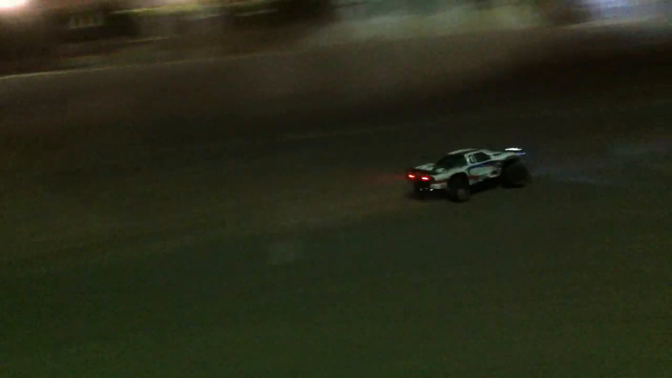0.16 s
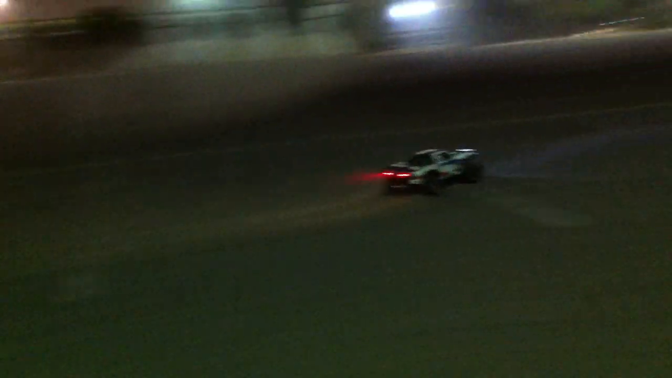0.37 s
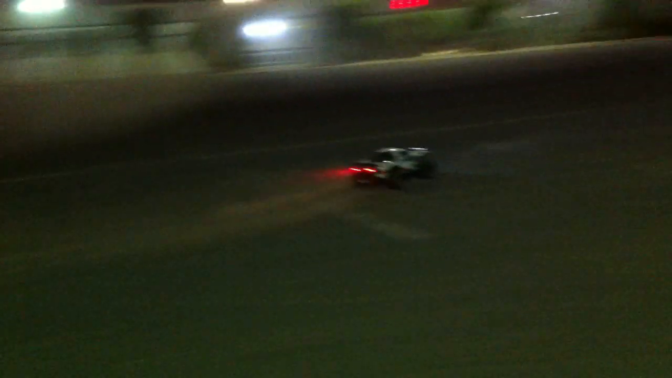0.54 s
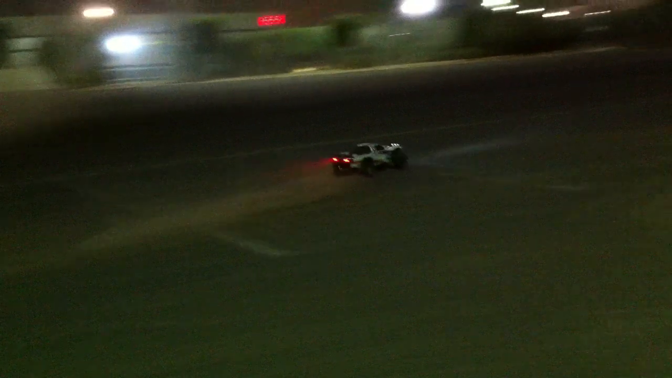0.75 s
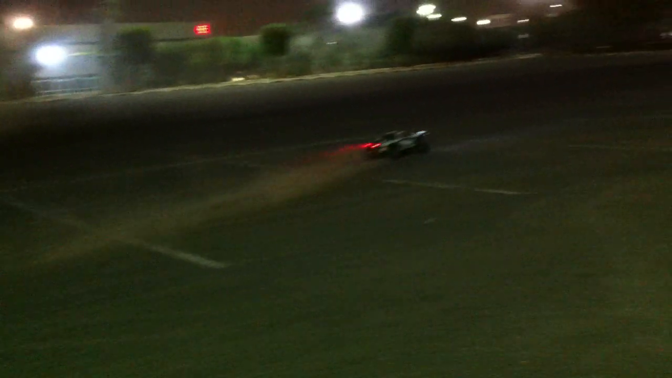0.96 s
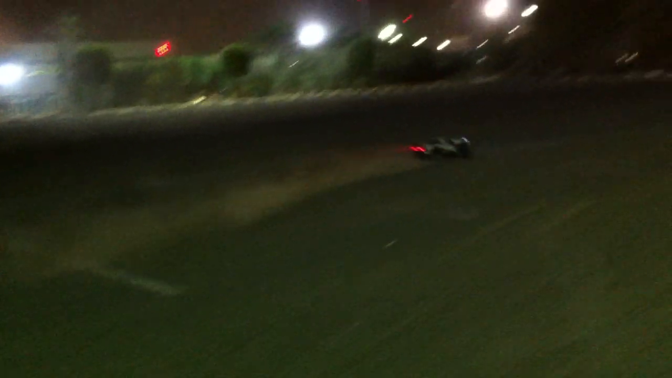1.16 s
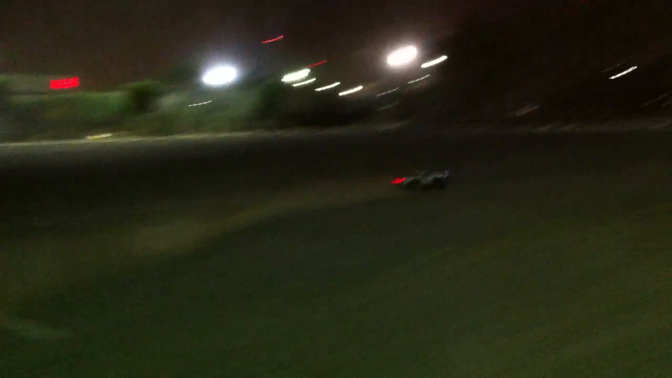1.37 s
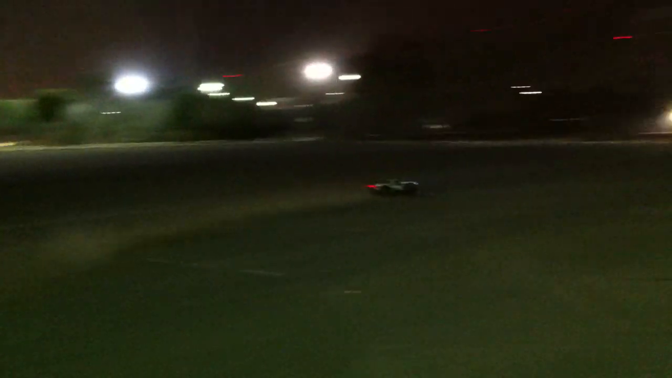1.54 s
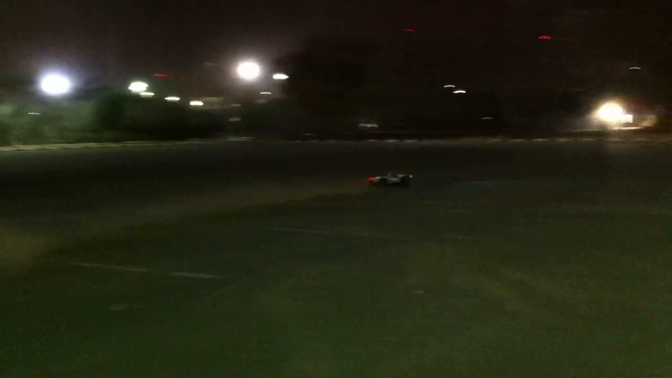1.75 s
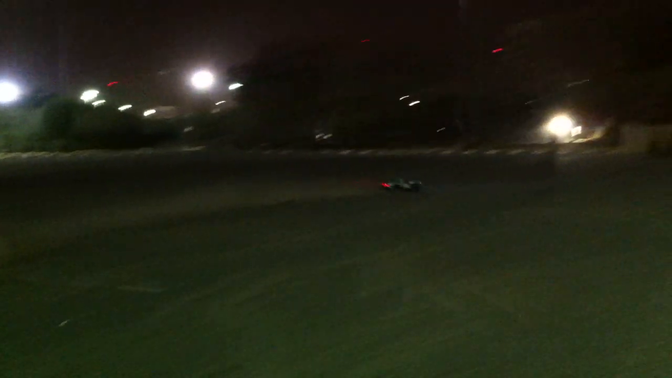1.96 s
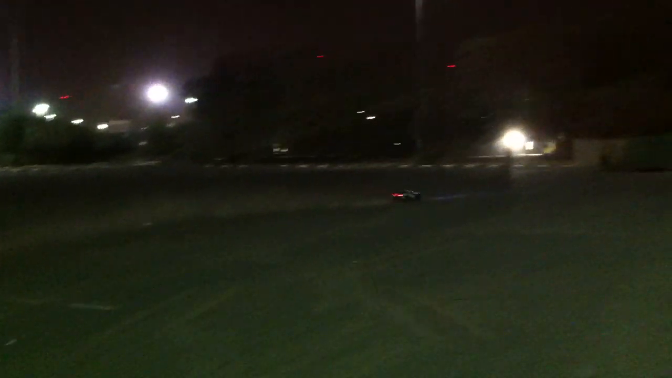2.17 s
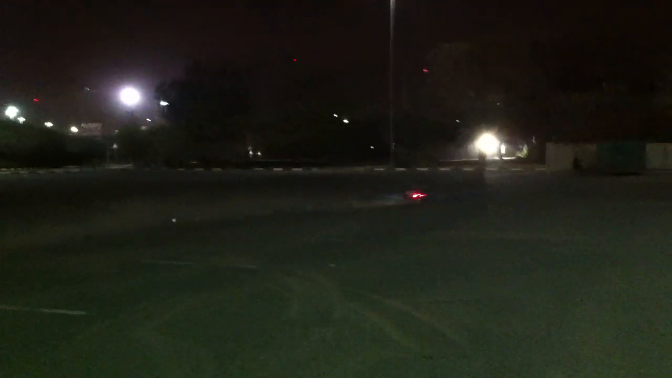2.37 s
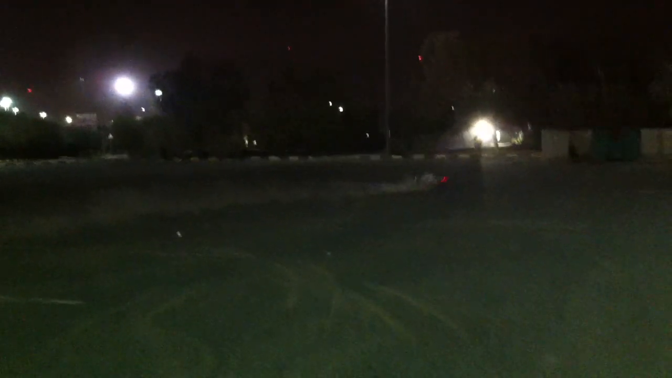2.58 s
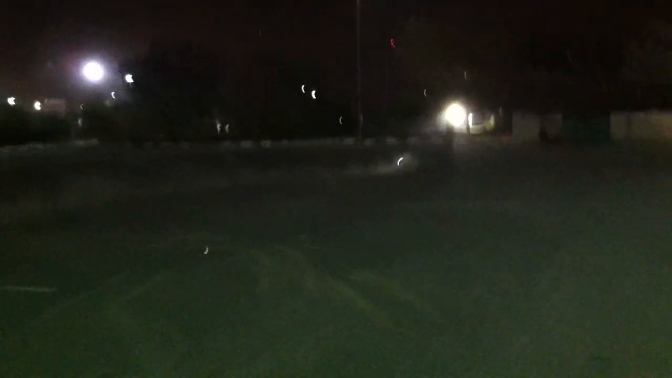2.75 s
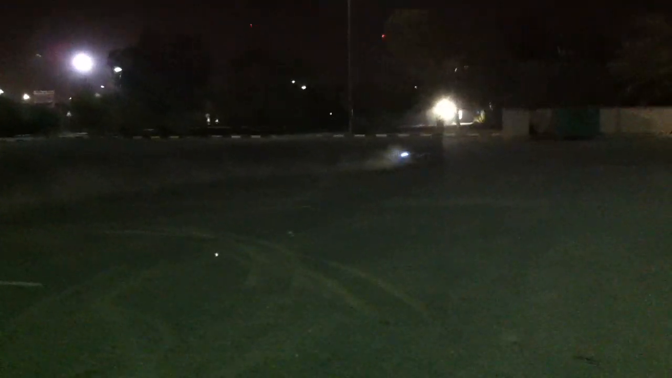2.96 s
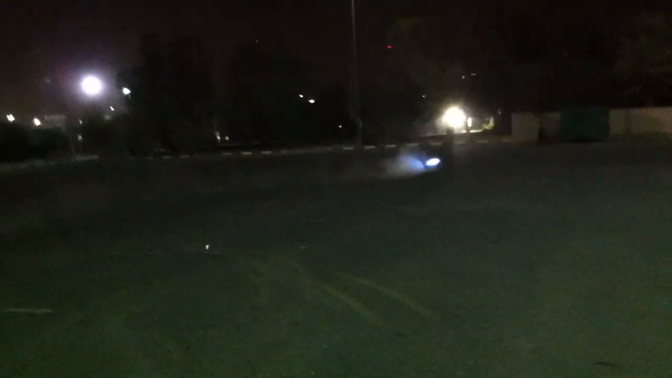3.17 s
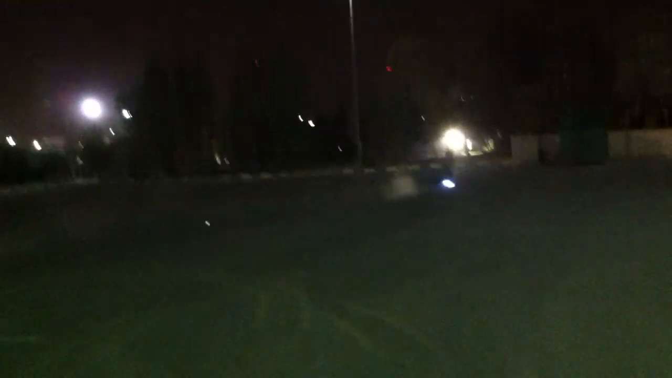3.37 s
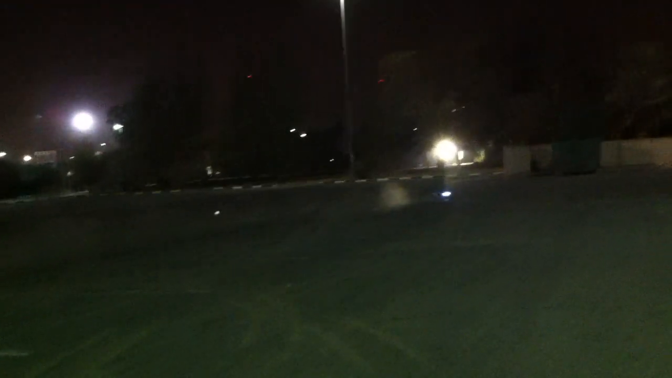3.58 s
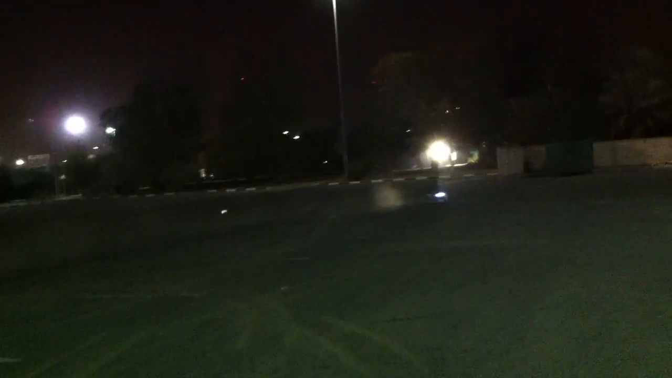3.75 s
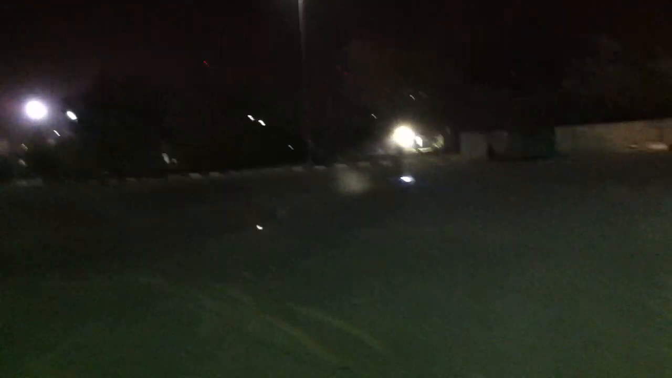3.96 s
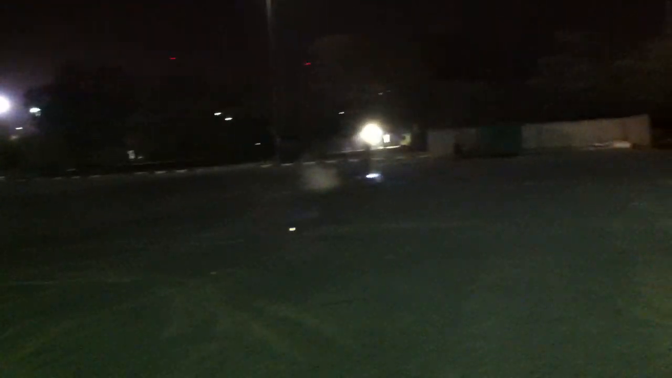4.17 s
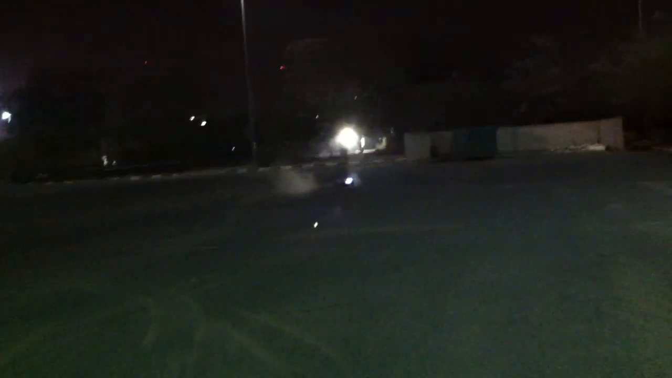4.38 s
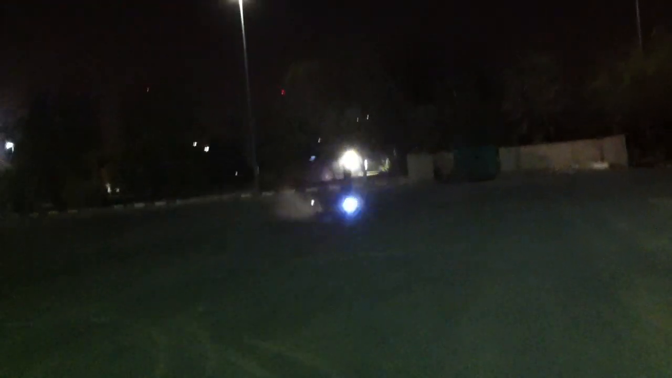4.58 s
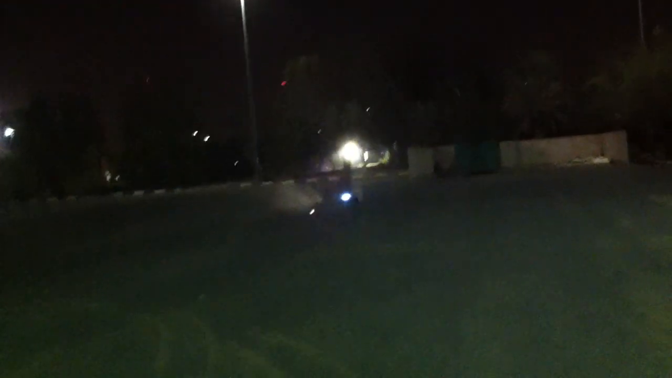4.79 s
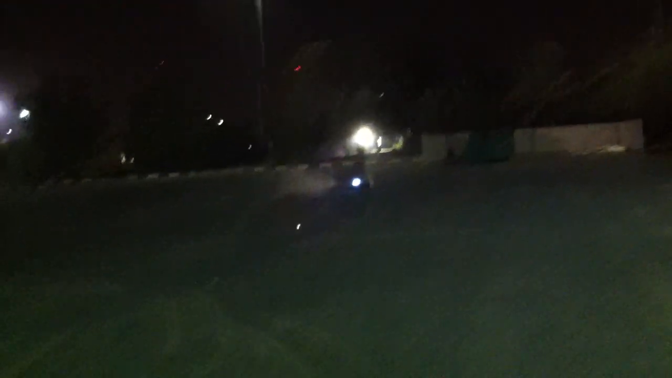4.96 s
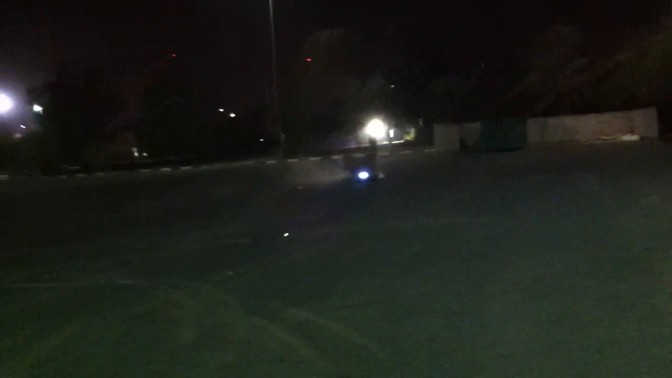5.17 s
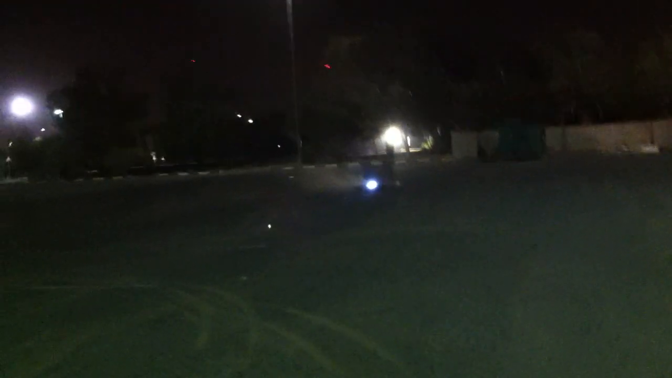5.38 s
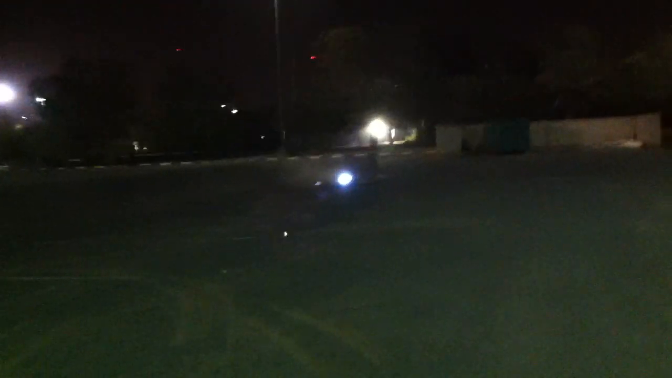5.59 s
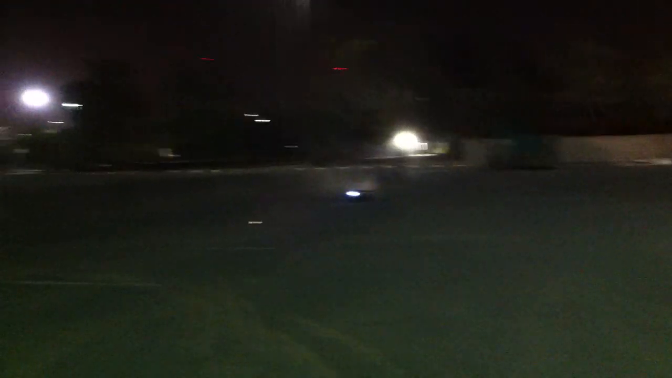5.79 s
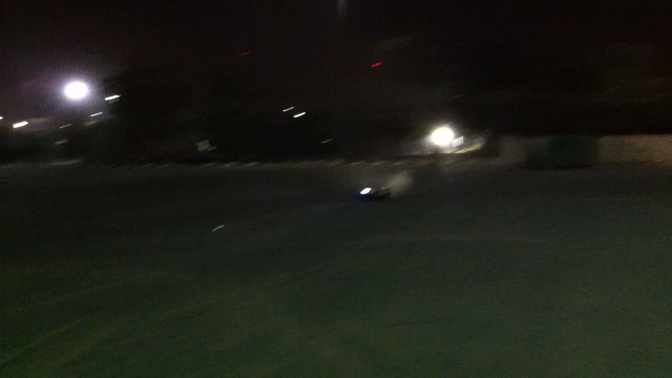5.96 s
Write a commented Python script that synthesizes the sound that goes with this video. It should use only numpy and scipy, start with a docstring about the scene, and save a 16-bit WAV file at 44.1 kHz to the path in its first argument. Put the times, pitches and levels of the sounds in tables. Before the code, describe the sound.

The small two-stroke engine of a remote control car buzzes loudly close by, lifts off for an instant and revs higher as it races away over an open asphalt lot. It drops to a quiet, puttering idle with a light gear whine and tyres scrubbing in the distance. A few short throttle blips follow, then it accelerates back toward the microphone, rising in pitch. Trees and a wall give a faint echo.

```python
"""The small two-stroke engine of a radio-controlled car races away over an open asphalt lot, coasts
to idle, turns round with two blips of throttle and accelerates back. Once a turn an exhaust pulse
excites the silencer, and the intake honks as the throttle opens. Off throttle the engine putters and
its crankcase clatters and hums. Gears whine through their housing; tyres hiss, scrub and flick grit.
A wall and trees reflect the sound, and a distant town roars beneath it."""
import sys
import numpy as np
from scipy import signal
from scipy.fft import rfft, irfft
from scipy.io import wavfile
from scipy.ndimage import uniform_filter1d, map_coordinates

SR = 44100
rng = np.random.default_rng(int(sys.argv[2]) if len(sys.argv) > 2 else 0)


def persist_wave(psi):
    """Save psi, clipped to +-1, as 16-bit WAV."""
    counts = np.round(np.clip(psi, -1, 1) * 32767).astype(np.int16)
    wavfile.write(sys.argv[1], SR, np.atleast_2d(counts).T)


N = 265923
TIME = np.arange(N) / SR
CLUTCH_SPEED, CLEAN_SPEED = 160, 116  # turns per second: the clutch bites; misfiring ends

# Throttle bursts. Each row: opening and shutting in seconds, target speed in turns per second, rev-up,
# run-down and catching times in seconds, relative bark in dB, relative rasp in dB, its trend in dB/s.
BURSTS = [(0, .611, 160.4, .044, .174, .002, -22.5, 2.5, -8.5),
          (.686, 1.611, 239.8, .143, .235, .006, -22.6, -.8, -3.3),
          (3.657, 4.086, 86.1, .03, .2, .08, -34, -16, 0),
          (4.086, 4.534, 161, .128, .055, .008, -26, -10.5, -1),
          (4.676, 4.811, 157.5, .04, .06, .002, -26.5, -10, -8),
          (5.032, 6.1, 159, .076, .1, .022, -23.3, -14.5, 5)]


def amp(db):
    """Decibels to amplitude ratio."""
    return 10 ** (np.asarray(db) / 20)


def evened(x):
    """Normalisation to an overall rms of 1."""
    return x / np.sqrt(np.mean(x ** 2) + 1e-20)


def steady(x, size=3500):
    """Normalisation to a running rms of 1."""
    return x / np.sqrt(uniform_filter1d(uniform_filter1d(x ** 2, size), size) + 1e-12)


def ease(start, length, curve):
    """A step response from 0 to 1: curve 1 is a first-order lag, higher starts more softly."""
    return 1 - np.exp(-(np.maximum(TIME - start, 0) / length) ** curve)


def swell(s, half):
    """A Gaussian envelope of height 1, centred on s."""
    return np.exp(-((TIME - s) / half) ** 2)


def drift(hz, step=64):
    """Random modulation: low-passed noise of rms 1."""
    coarse = TIME[::step]
    rolloff = np.exp(-(np.fft.rfftfreq(len(coarse), step / SR) / hz) ** 2)
    slow = irfft(rfft(rng.standard_normal(len(coarse))) * rolloff, len(coarse))
    return np.interp(TIME, coarse, evened(slow))


def read(points, hz):
    """Interpolation on a log-frequency axis."""
    f, value = np.transpose(points)
    return np.interp(np.log(hz + 1), np.log(f + 1), value)


def colour(x, shape, size=8192):
    """Minimum-phase filtering; shape gives dB against Hz, as a function or as points."""
    hz = abs(np.fft.fftfreq(size, 1 / SR))
    db = shape(hz) if callable(shape) else read(shape, hz)
    log_gain = np.log(amp(np.maximum(db, -100)))
    taps = np.fft.ifft(np.exp(signal.hilbert(log_gain).conj())).real[:size // 2]
    return signal.oaconvolve(x, taps)[:N]


def filtered(x, hz, kind="low", order=2):
    """Filtering with a maximally flat passband."""
    return signal.sosfilt(signal.butter(order, hz, kind, fs=SR, output="sos"), x)


def ring(x, modes):
    """Forced response of damped modes in parallel."""
    return sum(amp(db) * signal.lfilter(*signal.iirpeak(hz, hz / width, SR), x)
               for hz, width, db in modes)


def firings(turns, uneven_db, jitter_s, gas_decay, gas_floor, miss=0):
    """A quasi-periodic train: a pulse and a decaying puff of noise each turn; miss weakens every other."""
    samples = np.arange(N)
    at = np.interp(np.arange(1, int(turns[-1])), turns, samples)
    spread, late = rng.standard_normal((len(at), 2)).T
    missed = np.interp(at, samples, miss * np.ones(N)) * (np.arange(len(at)) % 2)
    at = at + late * jitter_s * SR
    strength = amp(uneven_db * spread) * (1 - missed)
    near = at.astype(int)[:, None] + np.arange(-8, 9)
    impulses = strength[:, None] * np.sinc(near - at[:, None])
    pulses = np.bincount(np.clip(near, 0, N - 1).ravel(), impulses.ravel(), N)
    puff = (gas_floor + np.exp(-(turns % 1) / gas_decay)) * np.interp(samples, at, strength)
    return steady(pulses), evened(puff * rng.standard_normal(N))


def town():
    """Distant town and road sounds merge into broadband noise whose level wavers gently."""
    # Each row: frequency in Hz, relative level in dB.
    roar = [(50, -43.5), (80, -40), (110, 4), (200, 3), (260, 3), (350, -13.5), (600, -27.5), (1000, 2),
            (1600, -2), (2500, -9.5), (7000, -36)]
    return amp(-46 + .8 * drift(hz=7.2)) * evened(colour(rng.standard_normal(N), roar))


def lot(x, echo_s=.115):
    """Reflection and scattering: a wall returns one dull echo, trees a thin decaying tail."""
    # Each row: frequency in Hz, reverberation time in seconds.
    decay_times = [(150, .3), (600, .6), (2500, .7), (6000, .1), (15000, .03)]
    arrivals = rng.standard_normal(SR) * (rng.random(SR) < 1500 / SR)
    hz, t, spectra = signal.stft(arrivals, SR, nperseg=256)
    envelope = amp(-60 * t / read(decay_times, hz)[:, None]) * (1 - np.exp(-t / .01))
    tail = signal.istft(spectra * envelope, SR, nperseg=256)[1]
    scattered = signal.fftconvolve(x, tail / np.linalg.norm(tail))[:N]
    echo = filtered(np.interp(TIME - echo_s, TIME, x, left=0), 3000)
    return amp(-20) * (scattered + echo)


def stones():
    """Impact excites one heavily damped mode: each flicked stone lands with a dry tick."""
    # Each row: start in seconds, relative level in dB, ring frequency in Hz.
    landings = [(2.0977, -25, 2410), (3.382, -14, 1910)]
    ticks = np.zeros(N)
    for s, db, hz in landings:
        t = np.maximum(TIME - s, 0)
        ticks += amp(db + 2) * np.sin(2 * np.pi * hz * t) * np.exp(-t / .00085)
    return filtered(ticks, 1000, "high")


def tyres(revs):
    """Friction noise: rubber hisses on gritty asphalt and hollow tyres resonate, fading with distance."""
    # Hiss spectrum. Each row: frequency in Hz, relative level in dB.
    hiss_colour = [(1000, -4), (2500, 16), (3800, 6.5), (5500, 1), (8000, -5.5), (12000, -8.5),
                   (15500, -14)]
    # Each row: frequency in Hz, bandwidth in Hz, gain in dB.
    cavity_modes = [(484, 63, -34), (602, 305, 12), (667, 190, -5)]
    # Each row: centre and half-length in seconds, hiss lift in dB, scrub lift in dB.
    slides = [(2.147, 0.2, 3, 6), (2.715, 0.28, 12.5, 9.5), (3.193, 0.36, 14.5, 8), (4.59, 0.2, 7.5, 7.5),
              (4.873, 0.033, 4.5, 6)]
    # Each row: time in seconds, distance of the car in metres.
    route = [(0, 2.1), (1.6, 4), (3, 101), (5, 20), (6, 1.2)]
    grain_size = amp(4.8 * np.minimum(rng.exponential(1, N), 5))
    grit = evened(grain_size * (rng.random(N) < 500 / SR))
    hiss = colour(rng.standard_normal(N) + amp(-7) * grit, hiss_colour)
    scrub = filtered(ring(rng.standard_normal(N), cavity_modes), 1200)
    hiss_db = -39.5 + 19.5 * revs + sum(db * swell(s, half) for s, half, db, _ in slides)
    scrub_db = -44.5 - .5 * revs + sum(db * swell(s, half) for s, half, _, db in slides)
    metres = np.interp(TIME, *np.transpose(route))
    doublings = np.maximum(np.log2(metres / 16), -1)
    return amp(-3.5 * doublings) * (amp(hiss_db) * evened(hiss) + amp(scrub_db) * evened(scrub))


def gears(turns, revs):
    """Meshing teeth sound harmonics of the crank speed; each swells as it crosses a housing resonance."""
    # Low and high housing resonances. Each row: frequency in Hz, gain in dB.
    housing_low = [(700, -32), (930, -14), (1035, 0), (1160, -8), (1275, 3), (1390, -11), (1540, -30)]
    housing_high = [(1480, -30), (1670, -3), (1790, 2), (1930, -13), (2060, 0), (2320, 1.5), (2450, -8),
                    (2680, -1), (3100, -30)]
    # Low band, then high. Each row: gain at clutch speed in dB, growth in dB per octave, then centre
    # and half-length in seconds and lift in dB of the spell when the wheels overrun the engine.
    bands = [(-53, 1, 2.48, .3, 12), (-47, 13, 2.1, .46, 8.5)]
    tones = whine = 0
    for k in range(6, 31):
        gain = amp(2.5 * drift(hz=10))
        tones = tones + gain * np.sin(2 * np.pi * (k * turns + rng.random()) + .3 * drift(hz=25))
    for housing, (db, growth_db, s, half, lift_db) in zip([housing_low, housing_high], bands):
        whine = whine + amp(db + growth_db * revs + lift_db * swell(s, half)) * colour(tones, housing)
    return whine


def hum(turns):
    """Resonance: crank harmonics hum where they meet crankcase modes, as they do at idle."""
    # Each row: harmonic number, mode frequency in Hz, bandwidth in Hz, gain in dB.
    harmonics = [(6, 520, 35, -55), (7, 575, 25, -46.5), (8, 690, 25, -55), (15, 1293, 35, -45.5)]
    return sum(ring(np.sin(2 * np.pi * k * turns) * amp(3 * drift(hz=10)), [mode])
               for k, *mode in harmonics)


def clatter(turns, revs):
    """Impact excitation: the piston knocks unevenly once a turn, ringing crankcase and chassis modes."""
    # Each row: frequency in Hz, bandwidth in Hz, relative gain in dB.
    low_modes = [(580, 60, -5), (770, 110, -10), (1060, 110, -4), (1295, 75, 0)]
    high_modes = [(1750, 18, 6), (2130, 18, 27), (2411, 13, 12)]
    knocks, rattle = firings(turns, uneven_db=1.8, jitter_s=15e-6, gas_decay=.25, gas_floor=.2)
    drive = knocks + amp(-12) * rattle
    low = colour(ring(drive, low_modes), [(100, 25), (450, -10.5), (1400, 11), (2500, -7.5), (9000, -12)])
    high = filtered(ring(drive, high_modes), [1500, 2800], "band", order=4)
    return amp(-47.5 + 37 * revs) * steady(low) + amp(-47.5 + 14 * revs) * steady(high)


def sputter(turns, speed, fire_chance=.7):
    """Intermittent combustion: at idle most turns fire, each drawing a soft pop from the silencer."""
    # Each row: frequency in Hz, relative level in dB.
    pop_colour = [(150, -8), (600, 2), (800, -4), (1200, 1), (1600, -7), (2500, 0), (3200, -14),
                  (5000, -23), (15000, -40)]
    new_turn = np.diff(np.floor(turns), prepend=0) > 0
    fires = new_turn & (rng.random(N) < fire_chance) & (speed < CLEAN_SPEED)
    kicks = fires * amp(-39 + 4 * rng.standard_normal(N).clip(-1.5, 1.5))
    t = TIME[:SR // 50]
    puff = (t == 0) + .22 * rng.standard_normal(len(t)) * np.exp(-t / .0018)
    pop = colour(np.pad(puff, (0, len(t))), pop_colour)[:2 * len(t)]
    return signal.oaconvolve(kicks, pop / abs(pop).max())[:N]


def intake(turns, lead_turns=.12):
    """Cavity resonance: the carburettor's gulps, just ahead of the exhaust, make the airbox honk."""
    # Honks as the throttle snaps open. Each row: centre and half-length in seconds, level in dB.
    honks = [(4.176, 0.05, -32.5), (4.718, 0.016, -28.5), (5.09, 0.023, -29.5)]
    # Each row: frequency in Hz, relative gain in dB.
    airbox = [(80, -40), (240, -2), (420, -9), (720, 0), (900, -5), (1150, -20), (3000, -45)]
    gulps, _ = firings(turns + lead_turns, uneven_db=.8, jitter_s=1e-5, gas_decay=.3, gas_floor=.2)
    return sum(amp(db) * swell(s, half) for s, half, db in honks) * steady(colour(gulps, airbox))


def shell(pulses, size=400, paths=3):
    """Multipath scattering: the body shell smears each pulse along paths that shift as the car bounces."""
    treble_tilt = [(500, -30), (1200, -16), (2600, -8), (4000, 2), (9000, 0)]
    out = pulses.copy()
    for _ in range(paths):
        scatter = rng.standard_normal(size) * np.exp(-TIME[:size] / .0028)
        scatter = colour(np.pad(scatter / np.linalg.norm(scatter), (0, size)), treble_tilt)[:size]
        out += np.tanh(2 * drift(hz=9)) * signal.oaconvolve(pulses, scatter)[:N] / np.sqrt(paths)
    return out


def bounced(x, delay, reflection=.33):
    """Comb filtering: short waves glance off the chassis and cut notches that slide with the delay."""
    treble = signal.oaconvolve(x, signal.firwin(101, 3200, pass_zero=False, fs=SR), "same")
    return x + reflection * map_coordinates(treble, [(TIME - delay) * SR])


def lagged(x, lag):
    """Dispersion: the short waves arrive later than the long ones."""
    hz = np.fft.rfftfreq(N, 1 / SR)
    group_delay = lag * np.clip((hz - 500) / 1300, 0, 1)
    return irfft(rfft(x) * np.exp(-2j * np.pi * np.cumsum(group_delay) * SR / N), N)


def silencer(flow):
    """Directivity: the silencer's colour and ring depend on the side that faces the listener."""
    # Spectra from seven sides. Each row: frequency in Hz, relative level in dB.
    passing = [(60, -45), (150, -3), (330, -6), (480, -4), (620, -10), (800, -11), (960, -5), (1100, -8),
               (1270, -1), (1500, -8), (1750, -9), (2250, 0), (2750, 0), (3200, -10), (3600, -6.5),
               (4500, -13), (5700, -12), (9500, -7), (12000, -13.5), (15500, -16)]
    close = [(60, -45), (130, -6), (220, -2.5), (460, -5), (690, -6), (920, 1), (1160, -9), (1400, -2),
             (1850, -9), (2100, -2), (2300, -5), (2570, 2), (3000, -1), (3250, -15), (4300, -14),
             (5700, -10), (9500, -6), (12000, -12.5), (15500, -15)]
    tail = [(60, -45), (140, -12), (240, -.5), (480, -4.5), (730, .5), (970, -6.5), (1210, 1.5), (1690, -8),
            (2420, 1), (2750, -1), (3300, -11), (5000, -15), (7200, -12.5), (9700, -9), (12000, -12.5),
            (15500, -16)]
    rear_quarter = [(60, -45), (160, -16), (320, -7.5), (480, -5.5), (640, -20), (800, -3), (965, -3.5),
                    (1120, -12), (1290, 0), (1450, -2.5), (1610, -20), (1930, -7), (2100, -18), (2420, -4),
                    (2740, -6.5), (2950, -16), (3200, -15.5), (3600, -23), (4350, -17), (5200, -25),
                    (11000, -30), (15500, -44)]
    turning = [(60, -45), (160, -18), (310, -7), (560, -17), (780, 2), (1080, -16), (1240, -5), (1550, -11),
               (1750, -6), (2550, -6), (2900, -15), (3400, -21), (4900, -17), (5500, -26), (11000, -31),
               (15500, -42)]
    flank = [(60, -45), (160, -22), (320, -7.5), (480, -11), (640, -8), (800, -4), (1100, -14), (1280, 1),
             (1620, -17), (1930, -11), (2200, -16), (2520, -7), (3100, -24), (3800, -16), (4400, -18),
             (6200, -26.5), (11000, -34), (15500, -48)]
    nose = [(60, -67), (140, -6.5), (240, 5.5), (480, 9), (730, 10), (960, 12), (1220, 3), (1450, 5),
            (1800, -3), (2200, -1), (2650, 6.5), (2950, 0), (3350, -16), (4350, -10), (4650, -20),
            (5400, -18), (6500, -27), (10000, -27), (15500, -52)]
    sides = [passing, close, tail, rear_quarter, turning, flank, nose]
    # Each row: time in seconds, index of the side heard.
    heading = [(.2, 0), (.42, 1), (.72, 1), (.98, 2), (1.65, 2), (4.1, 3), (4.56, 3), (4.67, 4), (4.85, 4),
               (5.03, 5), (5.5, 5), (5.76, 6)]
    # One row a side. Each row: ring frequency and bandwidth in Hz, lift in dB, lag of the shock behind
    # the low puff in seconds, delay of the chassis reflection in seconds.
    responses = [(2720, 250, 3, .0002, .0007), (2750, 300, 3, .0002, .00068), (2660, 160, 7, .0002, .00072),
                 (2520, 200, 6, .0022, .0023), (2500, 240, 2, .0012, .0016), (2530, 160, 8, .0022, .00208),
                 (2600, 350, 3, .0015, .0016)]
    when, facing = np.transpose(heading)
    flow = bounced(flow, np.interp(TIME, when, [responses[int(k)][-1] for k in facing]))
    heard = np.zeros(N)
    for k, (side, (ring_hz, width, lift_db, lag, _)) in enumerate(zip(sides, responses)):
        shape = lambda hz: read(side, hz) + lift_db / (1 + (2 * (hz - ring_hz) / width) ** 2)
        heard += np.interp(TIME, when, facing == k) * evened(lagged(colour(flow, shape), lag))
    return heard


def gas_flow(turns, speed):
    """Pulsating flow: each firing releases a pulse and turbulence, which share the power at each pitch."""
    # Turbulence against the clean pulse. Each row: frequency in Hz, ratio in dB.
    turbulence = [(150, -30), (700, -27), (1500, -24), (2700, -19), (4200, -6), (9000, -3), (15000, -2)]
    miss = .75 * np.clip((CLEAN_SPEED - speed) / 14, 0, 1)
    pulses, gas = firings(turns, uneven_db=.6, jitter_s=3e-6, gas_decay=.4, gas_floor=.4, miss=miss)
    gas = gas * amp(6 * swell(5.85, .3))  # burning coarsens as the car pulls hard
    pulse_db = lambda hz: -10 * np.log10(1 + amp(read(turbulence, hz)) ** 2)
    gas_db = lambda hz: read(turbulence, hz) + pulse_db(hz)
    return colour(shell(pulses), pulse_db) + colour(gas, gas_db)


def crank_speed(fast_idle=121.5, slow_idle=82.4, settle_s=2.41):
    """Inertia: the speed, in turns per second, lags the throttle as it revs up and runs down to idle."""
    # The slipping clutch holds the revs until the car gathers pace.
    # Each row: start and rise time in seconds, turns per second gained.
    pulls = [(.089, .292, 77), (1.07, .19, 2.9), (5.262, .344, 88.4)]
    # Bumps and changes of load. Each row: centre and half-length in seconds, share of the speed.
    surges = [(1.01, .05, .009), (1.13, .04, -.006), (1.23, .05, .007), (1.33, .04, -.006),
              (1.41, .04, .01), (1.5, .05, -.014), (1.6, .04, .013), (2.38, .1, .02), (4.13, .065, -.04),
              (4.43, .06, .006), (4.54, .03, -.015), (5.05, .04, -.055), (5.38, .05, .02),
              (5.53, .05, -.02)]
    speed = np.full(N, 143.6)
    for opens, shuts, target, rev_s, down_s, *_ in BURSTS:
        before = np.interp(opens, TIME, speed)
        run = before + (target - before) * ease(opens, rev_s, 2)
        run += sum(gain * ease(s, length, 2.4) for s, length, gain in pulls if opens < s < shuts)
        run += (fast_idle - run) * ease(shuts, down_s, 1)
        if shuts < settle_s:  # the car stops rolling and the idle drops
            run += (slow_idle - run) * ease(settle_s, .388, 2)
        speed = np.where(TIME >= opens, run, speed)
    return speed * (1 + sum(share * swell(s, half) for s, half, share in surges))


def crank_turns(speed, turns_per_wheel=6.2):
    """Frequency modulation: near top speed the wheels shake the drive; phase is the integral of speed."""
    # Each row: centre and half-length in seconds, depth as a share of the speed.
    shakes = [(1.27, .17, .011), (5.83, .25, .009)]
    wheel_phase = 2 * np.pi * np.cumsum(speed) / SR / turns_per_wheel
    shake = sum(depth * swell(s, half) for s, half, depth in shakes) * np.sin(wheel_phase)
    return np.cumsum(speed * (1 + shake + .002 * drift(hz=28))) / SR


def exhaust(turns, speed, revs):
    """Source and filter: gas flow drives the silencer; throttle and revs scale its bark and high rasp."""
    heard = silencer(gas_flow(turns, speed))
    bark = signal.oaconvolve(heard, signal.firwin(101, 3500, fs=SR), "same")
    rasp = steady(heard - bark) * amp(1.4 * drift(hz=28))  # flutters with uneven burning
    free, loaded = np.minimum(revs, 0), np.maximum(revs, 0)  # before and after the clutch bites
    bark_gain, rasp_gain = np.zeros((2, N))
    for opens, shuts, *_, catch_s, burst_db, burst_rasp_db, trend in BURSTS:
        bark_db = burst_db - .51 + 17.5 * free + 5 * loaded
        rasp_db = burst_rasp_db + .84 + 4 * free + trend * (np.clip(TIME, opens, shuts) - opens)
        opened, shut = ease(opens, catch_s, .96), ease(shuts, .007, .64)
        pumping = amp(-19) * (1 - ease(shuts, .43, .45))  # throttle shut, the piston still moves gas
        throttle = opened * (1 - shut + shut * pumping)
        bark_gain = np.maximum(bark_gain, throttle * amp(bark_db))
        rasp_gain = np.maximum(rasp_gain, throttle * amp(bark_db + rasp_db - 5 * shut))
    return bark_gain * steady(bark) + rasp_gain * rasp


def scene():
    """Superposition: one crank drives engine, gears and tyres; reflections, stones and town add to them."""
    speed = crank_speed()
    turns = crank_turns(speed)
    revs = np.log2(speed / CLUTCH_SPEED)  # octaves above clutch speed
    capped_revs = np.minimum(revs, .15)  # clatter, gears and tyres grow no further
    engine = exhaust(turns, speed, revs) + intake(turns) + sputter(turns, speed)
    crankcase = clatter(turns, capped_revs) + hum(turns)
    car = engine + crankcase + gears(turns, capped_revs) + tyres(capped_revs)
    return (car + lot(car) + stones() + town())[None]


def record(dry, edge_hz=15900):
    """Band limiting and saturation: a small microphone loses bass and top and rounds the tallest peaks."""
    thin = filtered(dry, 40, "high")
    rounded = thin / (1 + (thin / .75) ** 4) ** .25
    taps = signal.firwin(511, edge_hz, window=("kaiser", 9), fs=SR)
    return signal.oaconvolve(rounded, taps[None], "same")


dry = scene()
out = record(dry)
persist_wave(out)
```